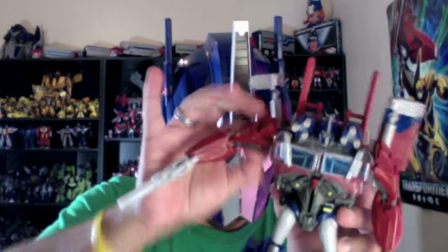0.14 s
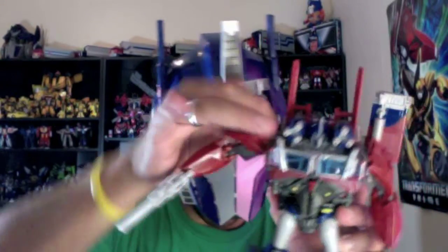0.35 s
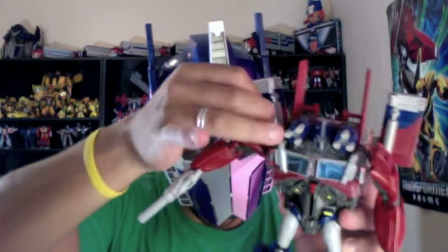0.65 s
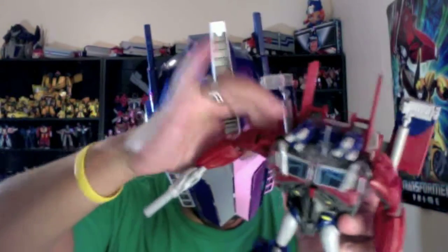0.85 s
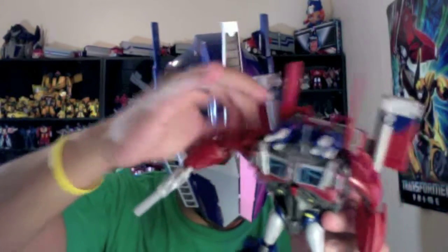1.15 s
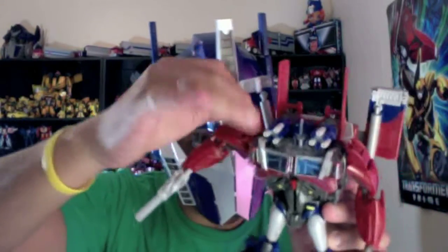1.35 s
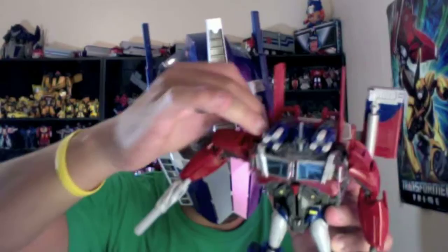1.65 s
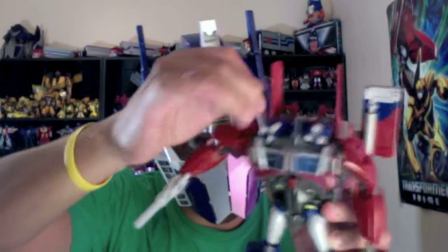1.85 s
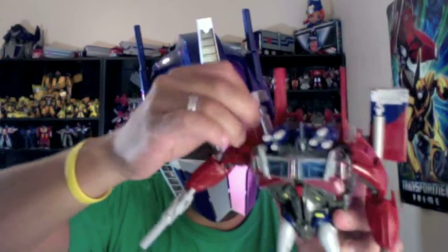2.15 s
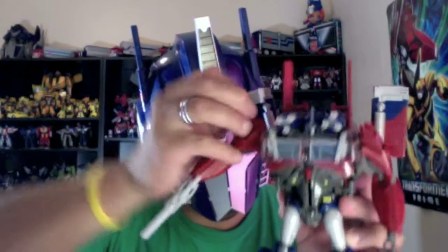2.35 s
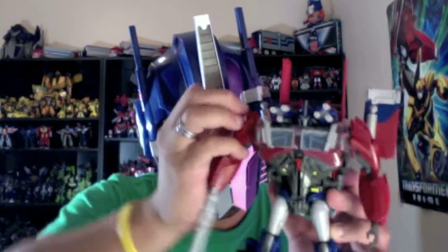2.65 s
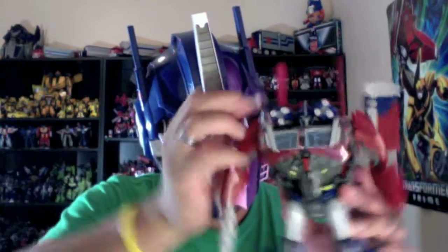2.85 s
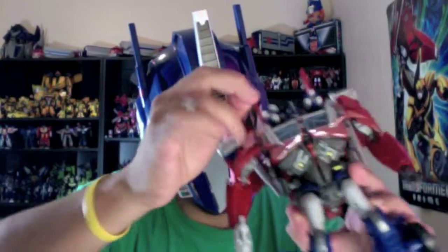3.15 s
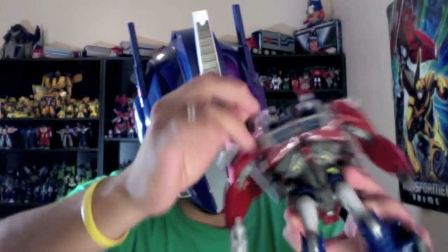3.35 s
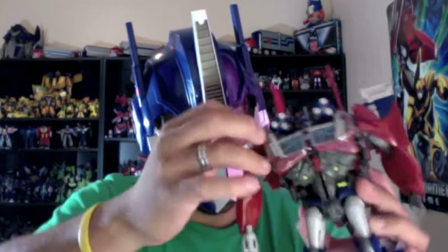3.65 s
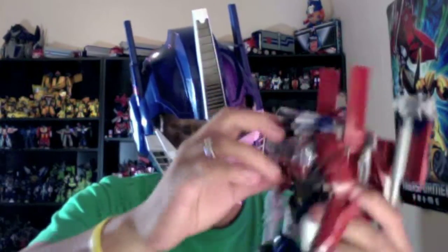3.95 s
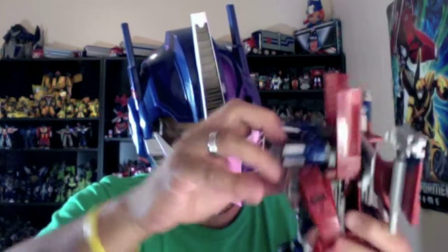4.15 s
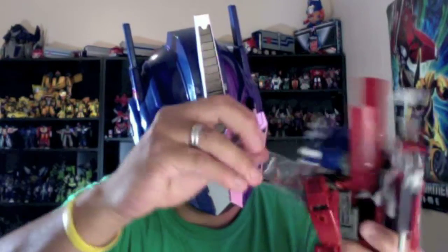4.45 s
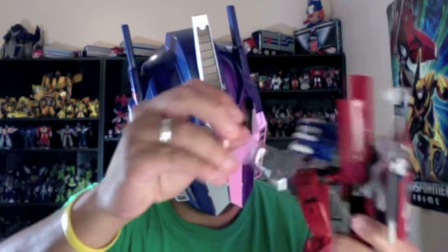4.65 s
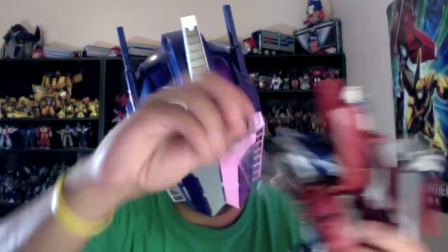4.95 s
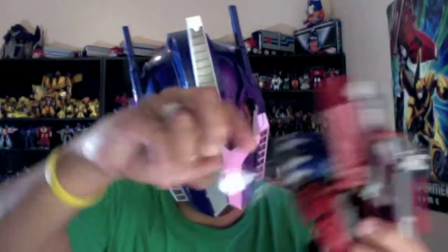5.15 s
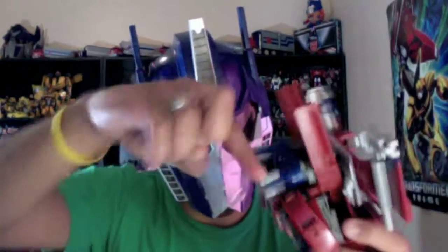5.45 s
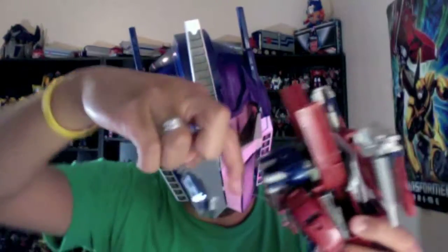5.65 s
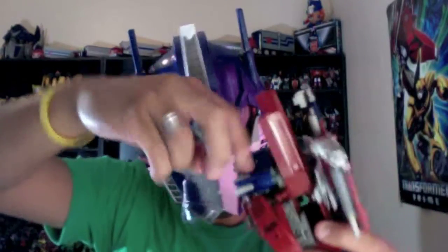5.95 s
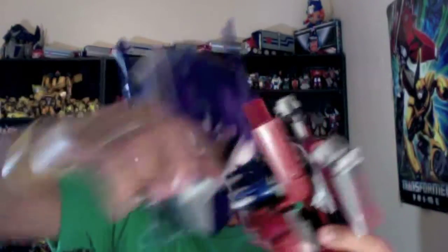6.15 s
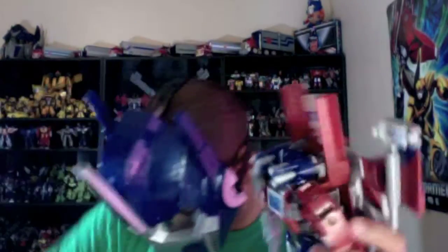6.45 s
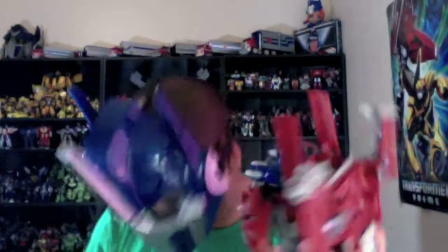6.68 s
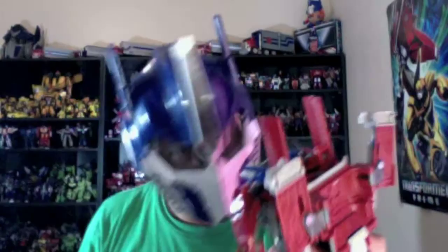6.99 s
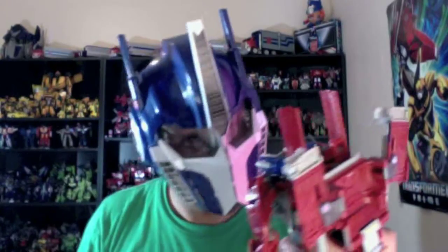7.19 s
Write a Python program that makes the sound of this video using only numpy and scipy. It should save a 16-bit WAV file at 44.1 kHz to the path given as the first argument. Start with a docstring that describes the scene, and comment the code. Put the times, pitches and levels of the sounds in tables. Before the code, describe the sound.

A jointed hard plastic toy is handled very close to the microphone in a small room with a short reverberation and faint low hum. Faint ticks open, then one sharp snap at 0.5 s. From 0.9 to 3 s come scattered light, dry clicks with small scrapes. At 3.16 s a very loud bright double crack with a dull thud starts rattling; another hard, lower snap lands at 3.5 s. After quieter ticking, a dense burst of loud snaps runs from 4.0 to 4.7 s, with chattering loose parts, short thuds and a tiny wavering squeak near 4.65 s. Softer clicks follow, with one strong snap at 5.27 s, then sparse ticks. Soft low bumps come at 6.1 s, light helmet taps from 6.3 s, and a clear hollow plastic knock at 6.6 s. A faint bump follows near 6.9 s, and crisp clicks close around 7.3 s.

```python
"""Jointed plastic toy figure handled close up

Parts snap, click and rattle: ragged noise contacts drive decaying modes, clumped touches ring the same modes.
Joints squeak as wavering tones; hard snaps add dull thuds. Late on a hollow plastic helmet is knocked, and
soft low bumps swell and fade. A small room answers with echoes and a banded tail; hum and room noise lie below."""
import sys
import numpy as np
from scipy import signal
from scipy.fft import rfft, irfft, next_fast_len
from scipy.io import wavfile

SR = 44100
rng = np.random.default_rng(int(sys.argv[2]) if len(sys.argv) > 2 else 0)


def unload_wav(signal):
    """Save mono or channel-first audio to the path in sys.argv[1] as 16-bit WAV at rate SR, clipped to [-1, 1]."""
    wavfile.write(
        sys.argv[1],
        SR,
        np.round(np.clip(np.atleast_2d(signal).T, -1, 1) * 32767).astype(np.int16),
    )


N = 322812

# snapping and clicking parts: start_s, nominal_peak_db, touched_part_hz,
# fall_above_db_per_octave, fall_below_db_per_octave
SNAPS = [(0.042, -34.5, 2400, 17, 27), (0.073, -32, 2290, 7.9, 27), (0.266, -45, 5000, 18, 12),
         (0.3506, -45, 4140, 6.8, 20), (0.449, -28, 4330, 14, 17), (0.4968, -3.5, 4330, 5.7, 13),
         (0.5282, -23, 6500, 9, 12), (0.5844, -36, 3450, 13, 16), (0.649, -35.5, 3860, 27, 13),
         (0.8769, -45, 2250, 9.4, 9), (0.9098, -33.5, 3730, 9, 7.4), (0.924, -28, 2530, 4.4, 12),
         (0.932, -20, 3660, 22, 16), (0.958, -28, 4140, 6.1, 9), (0.978, -41, 2040, 8.2, 9),
         (1.0252, -30.5, 4150, 18, 6.2), (1.1828, -21.5, 5580, 11.4, 15), (1.3394, -36.5, 4100, 11, 11),
         (1.4869, -24.5, 5200, 10.7, 8.2), (1.5116, -31, 1830, 6.7, 9), (1.5232, -29, 2080, 6.4, 12),
         (1.556, -30, 4200, 12, 18), (1.5987, -24, 3500, 24, 4.1), (1.682, -49, 3620, 11, 9),
         (1.702, -35, 3500, 21, 7.3), (1.7731, -21, 3270, 15, 9), (1.8781, -22.5, 2470, 3, 11),
         (2.1167, -23, 3350, 24, 11), (2.1998, -20, 1840, 5.2, 9), (2.206, -19, 3700, 13, 11),
         (2.2381, -25.5, 3650, 11, 14), (2.2514, -30.5, 3630, 9, 17), (2.2842, -31.5, 4240, 9, 6.1),
         (2.3488, -30.5, 4050, 3.6, 17), (2.418, -45.5, 5700, 6.2, 14), (2.5624, -32.5, 3700, 14, 10),
         (2.598, -34, 5200, 9, 14), (2.612, -25, 2520, 3.7, 13), (2.6734, -29, 2570, 11.6, 11),
         (2.7393, -27.5, 5620, 3, 6.7), (2.803, -37, 3900, 23, 18), (2.82, -38.5, 3630, 22, 12),
         (3.047, -27.5, 2460, 12, 25), (3.0607, -25, 6900, 9, 9), (3.0692, -28, 5040, 9, 7.5),
         (3.1373, -22, 2620, 13, 17), (3.1627, 2.5, 6930, 3.2, 7.2), (3.171, 0, 5760, 3, 12.4),
         (3.2178, -5, 3160, 7.8, 14), (3.2384, -16.5, 7260, 6.7, 12), (3.3365, -19, 2120, 3, 10),
         (3.3982, -30.5, 4180, 21, 14), (3.479, -17, 5100, 8.2, 6.8), (3.5017, -19, 1500, 6.6, 9),
         (3.5069, -2.5, 1330, 3, 9), (3.5179, -9.5, 4960, 9, 14), (3.6813, -29, 3100, 17, 9),
         (3.6925, -20.5, 3660, 17.4, 14), (3.7044, -28.5, 3500, 14, 5.2), (3.7444, -22, 3900, 16.6, 18),
         (3.7965, -32.5, 3500, 21, 6.3), (3.8575, -34.5, 2820, 18, 3.6), (3.8908, -38, 3520, 18, 9),
         (3.9734, -33.5, 2920, 12, 11), (3.9836, -25, 3080, 15, 17), (3.9964, -26, 1570, 4.4, 7.7),
         (4.0041, -10, 3900, 9, 9), (4.0191, 1, 4780, 12, 16), (4.0333, 3.5, 5220, 12, 9.3),
         (4.0523, 3.5, 3290, 3.5, 9), (4.058, 0.5, 4510, 8.2, 17), (4.0705, -13, 4380, 9, 9),
         (4.13, -12.5, 5660, 14, 9), (4.156, -7.5, 3200, 3, 16), (4.1689, -17.5, 3080, 3, 10),
         (4.2748, 1.5, 2060, 4.7, 5), (4.2931, 1, 3740, 5.9, 5.9), (4.3046, 1, 5350, 6.3, 6),
         (4.3204, -15, 3330, 7.7, 9), (4.4498, -18, 3150, 15, 7.6), (4.478, -11, 1840, 7.2, 9),
         (4.4908, -3.5, 3520, 4.4, 4.6), (4.4952, -2.5, 5550, 14, 21), (4.5263, -5, 4360, 5.3, 3),
         (4.6349, -8.5, 3630, 11.6, 21), (4.6587, -12, 2750, 4.3, 24), (4.6721, -10.5, 2840, 3, 24),
         (4.7059, -10.5, 2770, 3, 17), (4.7245, -13, 3200, 6.9, 15), (4.817, -22, 3630, 26, 26),
         (4.832, -27.5, 3240, 17, 13), (4.8648, -18.5, 6950, 7.3, 27), (4.9425, -23.5, 3340, 9, 7.4),
         (4.9497, -25, 3160, 14, 14), (5.0335, -39, 2350, 8.4, 12), (5.129, -27.5, 3400, 8, 14),
         (5.1375, -22, 3600, 17, 24), (5.1693, -23, 3700, 27, 19), (5.1948, -19.5, 3640, 11.3, 14),
         (5.22, -23.5, 3120, 22, 16), (5.255, -26.5, 3800, 14, 12), (5.2685, -2, 3700, 9, 6.7),
         (5.2784, -31, 3450, 9, 9), (5.3, -38, 5170, 9, 9), (5.4758, -28, 2630, 4.6, 26),
         (5.5224, -34, 3930, 5.5, 16), (5.552, -35.5, 3820, 6.4, 13), (5.6255, -21, 2430, 9.5, 24),
         (5.676, -20, 5360, 6.7, 12), (5.689, -15.5, 3770, 15, 23), (5.8092, -44, 3700, 8.1, 9),
         (6.3271, -26, 2470, 10.2, 23), (6.3664, -29.5, 3720, 14, 19), (6.4003, -22, 3000, 3.6, 9),
         (6.4294, -27.5, 3870, 10, 8.2), (6.48, -41, 4110, 15, 9), (6.5206, -39, 3240, 7.2, 9.9),
         (6.549, -39.5, 4160, 10.4, 9), (6.5984, -12, 1470, 14, 9), (6.6056, -1.5, 3730, 11.4, 14),
         (6.8556, -23, 1320, 7.6, 10), (7.1299, -40.5, 2930, 9, 9), (7.225, -27, 1640, 3.9, 9),
         (7.2542, -20, 3640, 3, 23), (7.2963, -9, 3560, 18.5, 27), (7.3091, -15.5, 3020, 14, 17)]
# ringing modes of the figure: pitch_hz, level_db, t60_s
FIGURE_MODES = [(1330, 0, .016), (1750, 0, .014), (2170, 0, .012), (2650, 0, .012), (3110, 0, .01),
                (3600, 0, .01), (4240, 0, .009), (4800, 0, .008), (5450, 0, .007), (6300, 0, .006),
                (7200, 0, .006), (8500, 0, .005), (10100, 0, .004), (12300, 0, .004), (14300, 0, .003)]


def from_db(db):
    """Decibels to gain."""
    return 10 ** (np.asarray(db) / 20)


def rms_one(x):
    """Scaled to rms 1."""
    return x / np.sqrt(np.mean(x ** 2) + 1e-20)


def at_hz(points, hz):
    """Reads a (Hz, value) table on a log-frequency axis."""
    points_hz, values = np.array(points).T
    return np.interp(np.log(hz), np.log(points_hz), values)


def convolve(a, b):
    """Row-wise convolution, cut to the length of a."""
    size = next_fast_len(a.shape[-1] + b.shape[-1])
    return irfft(rfft(a, size) * rfft(b, size), size)[..., :a.shape[-1]]


def drift(rate_hz):
    """Slow noise of rms 1: white noise through a double one-pole low-pass."""
    r = np.exp(-2 * np.pi * rate_hz / SR)
    noise = rng.standard_normal(N + SR)
    return rms_one(signal.lfilter([1], [1, -2 * r, r * r], noise)[SR:])   # settling second dropped


def strike(modes, colour_db, size, spread_db, detune):
    """One row per blow: decaying sine modes, each with a random strength and slight retuning by the grip."""
    hz, level_db, t60_s = np.transpose(modes)
    chance = rng.standard_normal((len(colour_db), 2, len(hz)))
    t, out = np.arange(size) / SR, 0
    for k in range(len(hz)):
        gain = from_db(level_db[k] + colour_db[:, k] + spread_db * chance[:, 0, k])
        pitch_hz = hz[k] * (1 + detune * chance[:, 1, k])
        ring = np.sin(2 * np.pi * np.outer(pitch_hz, t)) * from_db(-60 * t / t60_s[k])
        out = out + gain[:, None] * ring
    return out


def place(times_s, sounds):
    """Adds each sound at its time."""
    out = np.zeros(N + sounds.shape[1])
    for start_s, sound in zip(times_s, sounds):
        at = round(start_s * SR)
        out[at:at + len(sound)] += sound
    return out[:N]


def clicks():
    """Ragged contact drives the figure's modes; parts near the touched one in size answer most.

    Returns the direct sound and the smoother sum over all directions that fills the room."""
    # size classes (panels, limbs, tabs, edges): low_hz, high_hz
    part_bands = [(1300, 2300), (2300, 4200), (4200, 7200), (7200, 15000)]
    crest_db, coloured = 10, .5   # nominal peak over rms of first 4 ms; share of direct sound sent to the room
    start_s, peak_db, ring_hz, above_db, below_db = np.transpose(SNAPS)
    t = np.arange(1400) / SR
    head = SR // 250
    contact = rng.standard_normal((len(start_s), len(t))) * np.exp(-t / 0.002)
    own = np.sin(2 * np.pi * np.outer(ring_hz, t)) * from_db(-60 * t / .011)   # touched part
    rings = strike(FIGURE_MODES, np.zeros((len(start_s), len(FIGURE_MODES))),
                   size=len(t), spread_db=3, detune=.04)
    crack = t == 0   # impulse: fills in between the modes
    dull = signal.butter(1, 5000, fs=SR, output="sos")   # no contact is perfectly sharp
    whole = signal.sosfilt(dull, convolve(rings + 5 * crack, contact)) + 7 * own
    plain = signal.sosfilt(dull, crack + .06 * own)
    straight = around = 0
    for low_hz, high_hz in part_bands:
        octaves_up = np.log2(np.sqrt(low_hz * high_hz) / ring_hz)
        fall_db = above_db * octaves_up.clip(0) + below_db * (-octaves_up).clip(0)
        band = signal.butter(4, [low_hz, high_hz], "band", fs=SR, output="sos")
        part, smooth = signal.sosfilt(band, whole), signal.sosfilt(band, plain)
        part = part * (from_db(-fall_db) / part[:, :head].std(axis=1))[:, None]
        straight = straight + part
        same_energy = np.linalg.norm(part, axis=1) / np.linalg.norm(smooth, axis=1)
        around = around + smooth * same_energy[:, None]
    gain = (from_db(peak_db - crest_db) / straight[:, :head].std(axis=1))[:, None]
    return place(start_s, gain * straight), place(start_s, gain * (around + coloured * straight))


def shaking():
    """Gain of loose parts chattering after each snap: quick build-up, then decay; overlaps add in power."""
    level_db, t60_s, rise_s = -27, 0.28, 0.025   # level relative to the snap's nominal peak
    start_s, peak_db = np.transpose(SNAPS)[:2]
    t = np.arange(SR) / SR
    shape = (1 - np.exp(-t / rise_s)) * from_db(-60 * t / t60_s)
    power = np.outer(from_db(peak_db + level_db), shape) ** 2
    return np.sqrt(place(start_s, power))


def rattle():
    """Tiny touches in clumps, each ringing one figure mode; grip, scrapes and snaps set their level."""
    # loose parts rubbing in the grip: time_s, level_db
    grip_levels = [(0.0, -71), (1.55, -79.5), (1.71, -62.5), (1.91, -73), (3.12, -71), (3.22, -43),
                   (3.34, -53.5), (3.83, -60), (4.03, -64.5), (4.18, -44), (4.71, -58.5), (4.95, -74.5),
                   (5.4, -68.5), (6.01, -68), (6.36, -68), (6.54, -53.5), (7.01, -64), (7.32, -74)]
    # parts dragged over one another: middle_s, length_s, level_db
    scrape_swells = [(0.937, 0.066, -58), (1.515, 0.064, -48.5), (1.692, 0.036, -52.5), (4.023, 0.046, -29),
                     (4.813, 0.013, -62), (5.17, 0.019, -39), (5.5, 0.064, -57.5), (5.687, 0.037, -37.5),
                     (6.417, 0.055, -43), (7.253, 0.048, -43.5)]
    time_s, level_db = np.transpose(grip_levels)
    t = np.arange(N) / SR
    chance = rng.random(N)
    touches_per_s = 1300 * from_db(4 * drift(25))
    touch = chance < touches_per_s / SR
    size_db = 2.8 * np.minimum(rng.exponential(1, N), 4)
    sizes = touch * from_db(size_db) * rng.choice([-1, 1], N) + 1e-18
    dealt, out = rng.integers(0, len(FIGURE_MODES), N), 0   # mode that each touch lands on
    for k, (hz, mode_db, t60_s) in enumerate(FIGURE_MODES):
        r, w = from_db(-60 / (t60_s * SR)), 2 * np.pi * hz / SR
        ring = signal.lfilter([0, np.sin(w)], [1, -2 * r * np.cos(w), r * r], sizes * (dealt == k))
        out = out + from_db(mode_db) * ring
    light = signal.butter(3, [1500, 6000], "band", fs=SR, output="sos")   # light touches are thin and dull
    out = signal.sosfilt(light, out)
    scrape = sum(from_db(db) * np.exp(-(2 * (t - middle_s) / length_s) ** 4)
                 for middle_s, length_s, db in scrape_swells)
    return (from_db(np.interp(t, time_s, level_db)) + scrape + shaking()) * rms_one(out)


def squeaks():
    """Stick-slip in a turning joint: a short wavering tone with its octave."""
    # middle_s, length_s, pitch_hz, level_db, octave_level_db
    squeak_tones = [(4.649, 0.02, 1414, -32.5, -38), (4.669, 0.019, 1352, -31, -22)]
    t = np.arange(N) / SR
    waver_rad = 0.69 * drift(65)
    out = 0
    for middle_s, length_s, hz, level_db, octave_db in squeak_tones:
        phase = 2 * np.pi * hz * t + waver_rad
        tone = from_db(level_db) * np.sin(phase) + from_db(octave_db) * np.sin(2 * phase)
        out = out + np.exp(-(2 * (t - middle_s) / length_s) ** 4) * tone
    return out


def thuds():
    """Hard snaps jolt the whole figure: a low swing damped by the hand."""
    # start_s, peak_db, pitch_hz, t60_cycles
    jolts = [(3.163, -17, 451, 1.3), (3.508, -28.5, 470, 5.9), (4.034, -37, 500, 9.7),
             (4.0524, -13.5, 666, 4.1), (4.293, -32.5, 600, 4.5), (4.304, -18.5, 507, 2.8),
             (4.492, -19.5, 270, 1.1), (4.526, -23, 720, 4.7), (5.267, -23.5, 690, 10.5)]
    start_s, peak_db, hz, t60_cycles = np.transpose(jolts)
    cycles = np.outer(hz, np.arange(2000) / SR)
    decay = from_db(-60 * cycles / t60_cycles[:, None])
    swing = np.sin(2 * np.pi * cycles) * (1 - np.exp(-6 * cycles)) * decay
    return place(start_s, swing * (from_db(peak_db) / np.abs(swing).max(axis=1))[:, None])


def knocks():
    """Softer ragged contact on the helmet: shell modes near the struck spot's pitch ring strongest."""
    # start_s, nominal_peak_db, loudest_ring_hz, fall_db_per_octave, contact_decay_s
    helmet_hits = [(6.33, -34.5, 340, 6.5, 0.0022), (6.402, -32, 604, 10, 0.0067),
                   (6.44, -43, 570, 8, 0.003), (6.522, -41, 330, 4, 0.0021),
                   (6.599, -28.5, 876, 6, 0.00087), (6.606, -10, 2360, 5.5, 0.015),
                   (6.612, -16, 465, 12, 0.0054), (6.63, -30, 258, 17, .004), (6.859, -29, 1206, 8, 0.025)]
    # ringing modes of the hollow shell: pitch_hz, level_db, t60_s
    shell_modes = [(120, 0, .1), (200, -2, .05), (258, 0, .09), (330, -2, .05), (480, 0, .045),
                   (630, 0, .035), (860, -2, .03), (1200, 0, .035), (1470, 0, .035), (1836, 0, .045),
                   (2330, 0, .04), (2810, -1, .035), (3268, -2, .035), (3784, 0, .04), (4150, 0, .035)]
    start_s, peak_db, ring_hz, fall_db, contact_s = np.transpose(helmet_hits)
    octaves_off = np.log2(np.transpose(shell_modes)[0] / ring_hz[:, None])
    rings = strike(shell_modes, -fall_db[:, None] * np.abs(octaves_off), size=6000, spread_db=2, detune=.015)
    decay = np.exp(-np.outer(1 / contact_s, np.arange(6000) / SR))
    rings = convolve(rings, rng.standard_normal(rings.shape) * decay)
    rms_20ms = rings[:, :SR // 50].std(axis=1)
    return place(start_s, rings * (from_db(peak_db) / rms_20ms / 2)[:, None])   # peak taken as twice the rms


def bumps():
    """Soft dull bumps: low sines under a bell-shaped swell."""
    # middle_s, peak_db, pitch_hz, length_s
    soft_bumps = [(6.094, -32.5, 200, 0.047), (6.085, -38.5, 129, 0.043), (6.63, -29, 120, 0.043),
                  (6.79, -40, 106, 0.042), (6.875, -37.5, 125, 0.048)]
    t = np.arange(N) / SR
    return sum(from_db(db) * np.exp(-(2 * (t - middle_s) / length_s) ** 2) * np.sin(2 * np.pi * hz * t)
               for middle_s, db, hz, length_s in soft_bumps)


def room(x):
    """Smeared early echoes and a dense noise tail that dies band by band."""
    # reverberation time: band_hz, t60_s
    tail_t60 = [(150, 0.33), (500, 0.4), (1500, 0.15), (4000, 0.24), (8000, 0.21), (15000, 0.18)]
    # nearest surfaces: delay_s, level_db
    early_echoes = [(.0095, -36), (0.021, -30.5), (0.033, -21)]
    tail_db = -9.5
    t = np.arange(SR // 2) / SR
    edges_hz = 100 * 2 ** np.arange(0, 7.6, .5)
    tail = 0
    for low_hz, high_hz in zip(edges_hz, edges_hz[1:]):
        half_octave = signal.butter(2, [low_hz, high_hz], "band", fs=SR, output="sos")
        band = signal.sosfilt(half_octave, rng.standard_normal(len(t)))
        tail = tail + band * from_db(-60 * t / at_hz(tail_t60, np.sqrt(low_hz * high_hz)))
    tail = tail * np.clip((t - .003) / 0.0013, 0, 1)   # build-up
    answer = from_db(tail_db) * tail / np.sqrt(np.sum(tail ** 2))
    for delay_s, level_db in early_echoes:
        smear = rng.standard_normal(len(t)) * (t > delay_s) * np.exp(-np.abs(t - delay_s) / .0008)
        answer = answer + from_db(level_db) * smear / np.sqrt(np.sum(smear ** 2))
    return convolve(x, answer)


def background():
    """Steady spectrally shaped room noise and wavering hum lines of narrow-band noise."""
    # room noise spectrum: freq_hz, relative_density_db
    air_spectrum = [(24, -16), (40, -20.5), (85, -22), (118, 4), (147, -6.5), (256, -4), (790, -9),
                    (965, -12), (1210, -11.5), (3740, -22.5), (4130, -40.5), (6020, -36.5), (13000, -41.5),
                    (16000, -59)]
    # hum lines: freq_hz, rms_db, width_hz
    hum_lines = [(57.3, -67, 1.9), (121.96, -64.5, 1.9), (263, -73, 12), (575, -73.5, 11)]
    air_rms_db = -58
    hz = np.maximum(np.fft.rfftfreq(N, 1 / SR), 1)
    air = irfft(rfft(rng.standard_normal(N)) * from_db(at_hz(air_spectrum, hz)), N)
    out = from_db(air_rms_db) * rms_one(air)
    for line_hz, rms_db, width_hz in hum_lines:
        line = rfft(rng.standard_normal(N)) / (1 + (2 * (hz - line_hz) / width_hz) ** 2)
        out = out + from_db(rms_db) * rms_one(irfft(line, N))
    return out


def scene():
    """Handling sounds, direct and through the room, over the bumps and background."""
    straight, around = clicks()
    small_body = signal.butter(2, 140, "high", fs=SR, output="sos")   # small bodies radiate little bass
    hollow = signal.sosfilt(small_body, knocks() + thuds())
    rest = hollow + rattle() + squeaks()
    return (straight + rest + room(around + rest) + bumps() + background())[None]


def record(dry):
    """Overloads clip at full scale; then the deepest bass and the top are cut."""
    bass_cut = signal.butter(2, 55, "high", fs=SR, output="sos")
    top_cut = signal.cheby2(12, 50, 16900, fs=SR, output="sos")   # 50 dB down from 16900 Hz up
    return signal.sosfilt(top_cut, signal.sosfilt(bass_cut, np.clip(dry, -1, 1)))


dry = scene()
out = record(dry)
unload_wav(out)
```